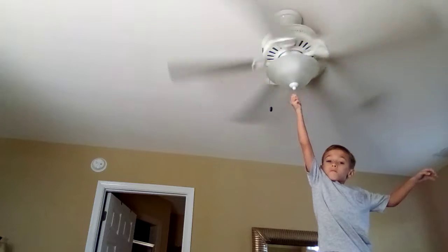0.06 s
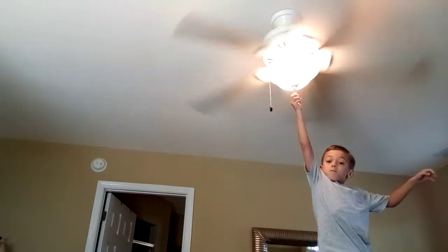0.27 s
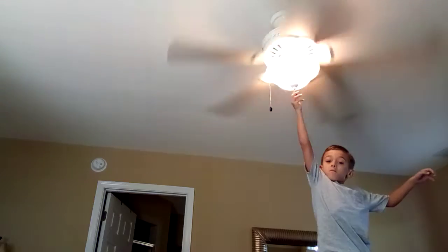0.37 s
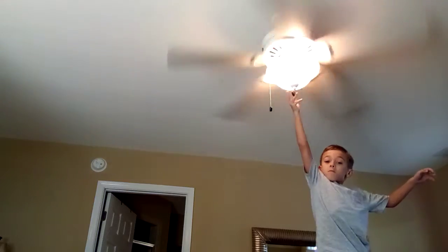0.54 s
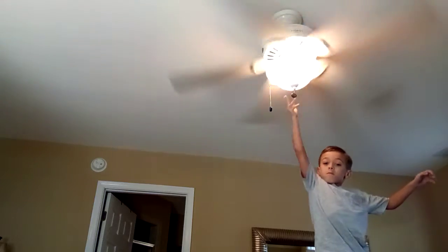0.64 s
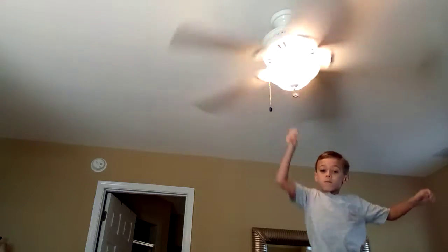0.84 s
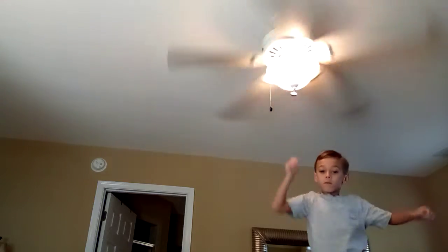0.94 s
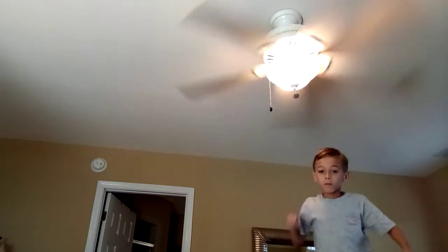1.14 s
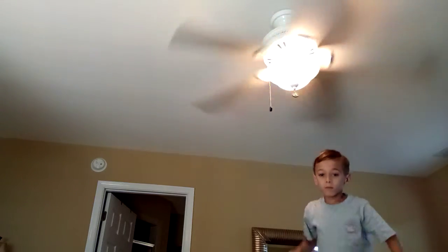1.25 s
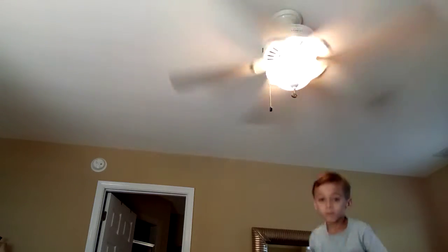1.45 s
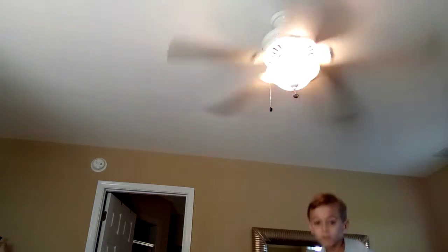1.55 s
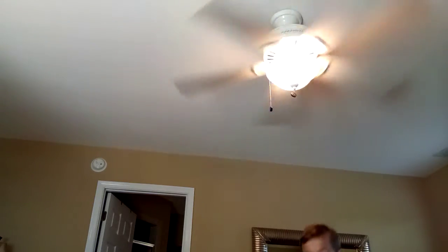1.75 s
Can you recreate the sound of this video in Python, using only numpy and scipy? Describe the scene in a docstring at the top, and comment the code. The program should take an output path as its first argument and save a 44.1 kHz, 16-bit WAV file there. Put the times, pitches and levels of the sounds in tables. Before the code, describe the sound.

A ceiling fan's pull chain clicks twice over the fan's low, soft hum.

```python
"""A ceiling fan turns in a bedroom, with a low rush of air and a soft motor hum throughout.
The pull chain of its lamp is tugged and the switch snaps: a quick rattle of contacts that rings
the metal fitting and the glass shade. The chain slides back through its guide and the switch
snaps again. Then the freed chain jingles faintly, and clothes swish and weight shifts softly
as the person steps down."""
import sys
import numpy as np
from scipy import signal
from scipy.fft import rfft, irfft, next_fast_len
from scipy.io import wavfile
from scipy.ndimage import uniform_filter1d

SR = 44100
rng = np.random.default_rng(int(sys.argv[2]) if len(sys.argv) > 2 else 0)


def dump_mix(stems):
    """Bounce the given channels to the path in sys.argv[1] as a 16-bit WAV at rate SR."""
    frames = np.atleast_2d(stems).T  # one column per channel
    limited = np.clip(frames, -1, 1)  # hard clip at full scale
    pcm = np.round(limited * 32767).astype(np.int16)
    wavfile.write(sys.argv[1], SR, pcm)


N = 79380
T = np.arange(N) / SR

# ratchet contacts as the chain is pulled, and as the spring takes it back: start_s, level_db
PULL_CONTACTS = [(0.2084, 0.5), (0.2098, 4.5), (0.2113, 3.5)]
RELEASE_CONTACTS = [(0.4191, 1), (0.4219, 2), (0.4241, -1.5), (0.4290, -5), (0.4320, -6.5), (0.4340, -8.5),
                    (0.4480, -12)]
# response of the switch housing, under tension and slack: frequency_hz, gain_db
TENSE_HOUSING = [(620, -26), (760, -8), (970, -15.5), (1350, -34), (1750, -11.5), (2050, -30), (2500, -12),
                 (2950, -30), (3300, -11.5), (4150, -17.5), (4600, 0), (5300, -2), (6600, -1.5), (8600, -2),
                 (9100, -10.5), (10600, -8.5), (11300, -6), (13000, -22.5), (15300, -7.5), (16200, -28.5)]
SLACK_HOUSING = [(680, -27), (790, -2), (980, -5.5), (1200, -10.5), (1600, -6), (2000, -20.5),
                 (2600, -11.5), (3500, -11.5), (4600, -3), (5500, -3.5), (6600, 4), (7200, -5.5),
                 (7700, -13.5), (9600, -16.5), (10500, -24.5), (13000, -35), (15200, -9.5), (16200, -12)]
# modes of the lamp fitting and shade: pitch_hz, pull_db, release_db
FITTING_MODES = [(791, -57, -62), (1669, -62, -54), (1770, -59, -58), (2651, -61, -56), (3202, -53, -62),
                 (3311, -55, -60), (3970, -60, -48), (4492, -47, -48), (4728, -44, -46), (4767, -46, -47),
                 (5611, -41, -48), (5724, -49, -47), (5935, -47, -46), (6031, -41, -45), (6187, -44, -47),
                 (6499, -48, -40), (6626, -45, -39), (7040, -45, -44), (7099, -48, -46), (7304, -42, -51),
                 (7475, -46, -60), (7780, -46, -56), (8352, -43, -52), (8526, -40, -58), (9298, -45, -58),
                 (9674, -47, -53), (10800, -50, -66), (10800, -52, -68), (11160, -51, -68)]
# modes of the switch cup: pitch_hz, pull_db, release_db, t60_s
CUP_MODES = [(780, -35, -39, .036), (835, -37, -32, .036), (935, -37.5, -32, 0.036)]
# slides of the chain through its guide: peak_s, level_db, half_width_s
CHAIN_SLIDES = [(0.345, -63, 0.011), (0.375, -59.5, 0.037)]
# friction of beads on the guide: frequency_hz, density_db
SLIDE_SPECTRUM = [(1500, -23), (2500, -9), (3050, -1), (3700, -3.5), (4400, 2.5), (6500, 3), (8500, -16),
                  (12000, -27)]
# shakes of the freed chain: peak_s, level_db, half_width_s
CHAIN_SHAKES = [(0.965, -77.5, .03), (0.998, -69.5, 0.017)]
# modes of the chain and its pendant: pitch_hz, level_db
CHAIN_MODES = [(3074, 3), (3354, -1), (4377, -8), (4727, 2.5), (5286, -7), (5733, -5), (6600, -9)]
# swishes of fabric: peak_s, level_db, half_width_s
FABRIC_SWISHES = [(0.97, -73.5, 0.087), (1.513, -67.5, 0.054)]
# the fabric's dull rub and bright swish: frequency_hz, density_db
RUB_SPECTRUM = [(300, -7), (700, 4.5), (1600, -9.5), (2400, -13.5), (5000, -18.5), (8000, -35)]
SWISH_SPECTRUM = [(1000, -17), (2130, -8), (2600, -8), (3500, -1), (4050, 0), (4500, -5), (4850, -3.5),
                  (5250, 8), (6700, -1), (8000, -20), (12000, -31)]
# resonances in the rustle of stepping down: pitch_hz, level_db, peak_s
RUSTLE_BANDS = [(790, -64.5, 1.502), (1083, -72, 1.41), (1444, -74.5, 1.46), (1646, -71.5, 1.497),
                (1734, -74, 1.46), (2150, -76, 1.52), (3440, -75, 1.51), (5160, -74, 1.52)]
# shifts of weight: peak_s, level_db, half_width_s
WEIGHT_SHIFTS = [(0.13, -60, 0.02), (0.46, -56.5, 0.05), (0.712, -62, 0.05), (0.813, -56, 0.018),
                 (1.172, -54.5, 0.026), (1.30, -58, .018), (1.39, -58.5, .018), (1.56, -54.5, 0.045),
                 (1.665, -53, 0.035)]
# their soft thud: frequency_hz, density_db
THUD_SPECTRUM = [(25, -21.5), (50, -16), (75, 8.5), (105, -5.5), (145, -6), (200, -4.5), (250, -3.5),
                 (350, -18.5), (600, -38), (2000, -71)]
# air stirred by the blades: frequency_hz, density_db
AIR_SPECTRUM = [(22, -30), (45, -11), (75, -12.5), (100, -4.5), (140, 2.5), (190, -2.5), (260, 0.5),
                (350, 1.5), (440, -6.5), (520, -11), (690, -22), (790, -17), (900, -32.5), (1100, -31),
                (2000, -39), (6000, -61.5)]
# rise and fall of that rush: time_s, level_db
AIR_ENVELOPE = [(0.0, -50), (0.12, -56), (0.30, -49), (0.36, -53.5), (0.48, -51), (0.58, -58),
                (0.63, -51.5), (0.73, -49.5), (0.78, -52), (0.886, -48), (0.93, -57), (0.985, -50.5),
                (1.085, -57), (1.125, -48), (1.245, -57), (1.278, -47.5), (1.33, -53.5), (1.47, -55),
                (1.585, -49), (1.615, -53), (1.68, -46.5), (1.74, -55), (1.8, -51)]
# partials of the motor hum: pitch_hz, level_db
HUM_PARTIALS = [(76, -74), (139, -66.5), (252.5, -66), (298, -68), (436, -71)]
# reverberation time of the bedroom: frequency_hz, t60_s
ROOM_DECAY = [(800, 0.46), (2000, .32), (5000, 0.35), (7000, 0.3), (10000, .28), (15000, 0.16)]
# faint steady hiss: frequency_hz, density_db
HISS_SPECTRUM = [(300, 0), (1200, 0), (2200, -3), (3200, -6), (6300, -6), (7200, -14), (8000, -19),
                 (13900, -20), (15000, -11), (16200, -11)]

PULL_S, RELEASE_S = PULL_CONTACTS[0][0], RELEASE_CONTACTS[0][0]


def snap(contacts, housing, level_db, decay_s=0.0015):
    """Source and filter: brief impacts add in power; the housing colours them and their echoes."""
    power = sum((from_db(db) * (T >= s) * np.exp(-np.maximum(T - s, 0) / decay_s)) ** 2
                for s, db in contacts)
    crack = np.sqrt(power) * rng.choice([-1, 1], N)
    return from_db(level_db) * colour(crack + bedroom(power), housing)


def fitting(gain_db=-1.8, rise_s=0.0026):
    """Free vibration: both snaps excite the same damped modes, each in its own proportions."""
    out = np.zeros(N)
    for hz, pull_db, release_db in FITTING_MODES:
        t60 = 1.2 * at_hz(ROOM_DECAY, hz)  # slightly outlasts the room
        for s, db in ((PULL_S, pull_db), (RELEASE_S, release_db)):
            rise = 1 - np.exp(-np.maximum(T - s, 0) / rise_s)
            out += from_db(db + gain_db) * rise * dying(s, t60) * sine(hz)
    return out


def cup_knock(rise_s=0.007):
    """Heavy damping: the cup's modes build up over each rattle and die as a short hollow knock."""
    out = np.zeros(N)
    for hz, pull_db, release_db, t60 in CUP_MODES:
        for s, db in ((PULL_S, pull_db), (RELEASE_S, release_db)):
            rise = np.clip((T - s) / rise_s, 0, 1)
            out += from_db(db) * rise * dying(s, t60) * sine(hz)
    return out


def chain(ticks_per_s=600, t60_s=0.18):
    """Friction, then impact: beads scrape the guide, then collide and excite the chain's modes."""
    slide = swells(CHAIN_SLIDES) * colour(ringing_noise(), SLIDE_SPECTRUM)
    shake = swells(CHAIN_SHAKES)
    ticks = shake * (rng.random(N) < ticks_per_s / SR) * rng.standard_normal(N)
    jingle = 0
    for hz, db in CHAIN_MODES:
        mode = dying(0, t60_s) * np.sin(2 * np.pi * hz * T)
        jingle += from_db(db) * rms_one(signal.fftconvolve(ticks, mode)[:N])
    return slide + rms_one(jingle) * np.sqrt(np.mean(shake ** 2))


def clothes(rub_db=4, rub_lead_s=0.068):
    """Friction noise: a dull rub of fabric leads each bright swish."""
    rubbing = sum(from_db(db + rub_db) * swell(s - rub_lead_s, half_width_s=0.091)
                  for s, db, _ in FABRIC_SWISHES)
    rub = rubbing * colour(ringing_noise(), RUB_SPECTRUM)
    swish = swells(FABRIC_SWISHES) * colour(ringing_noise(), SWISH_SPECTRUM)
    return rub + swish


def rustle():
    """Narrow-band noise: unsteady resonances swell in turn as the person steps down."""
    out = np.zeros(N)
    for hz, db, s in RUSTLE_BANDS:
        band = np.real(drift(rate_hz=14) * np.exp(2j * np.pi * hz * T))
        out += from_db(db) * swell(s, half_width_s=0.045) * band
    return out


def thuds():
    """Soft impact: weight shifts slowly, so its energy lies at low frequencies."""
    return swells(WEIGHT_SHIFTS) * even_noise(THUD_SPECTRUM)


def fan(waver_depth=0.55, air_db=-0.5):
    """Broadband and tonal noise: stirred air and wavering motor partials swell together."""
    level_db = np.interp(T, *np.transpose(AIR_ENVELOPE))
    air = from_db(air_db + level_db) * even_noise(AIR_SPECTRUM)
    hum = 0
    for hz, db in HUM_PARTIALS:
        waver = 1 + waver_depth * drift(rate_hz=3.1)
        carrier = np.exp(2j * np.pi * (hz * T + rng.random()))
        hum += from_db(db) * np.sqrt(2) * np.real(waver * carrier)
    return air + hum * from_db(level_db - level_db.mean())


def bedroom(power, early_db=-4.5, early_t60_s=0.086, tail_db=-2.5, first_echo_s=0.005):
    """Reverberation: close echoes off ceiling and blades, then a tail whose treble dies sooner."""
    def envelope(t60):
        shape = dying(first_echo_s, t60) ** 2
        return np.sqrt(np.abs(signal.fftconvolve(power, shape / shape.sum())[:N]))
    white = rfft(rng.standard_normal(N))
    hz = np.arange(N // 2 + 1) * SR / N
    edges_hz = np.geomspace(300, 20000, 13)
    tail = 0
    for low, high in zip(edges_hz, edges_hz[1:]):
        band = irfft(white * (hz >= low) * (hz < high), N)
        tail += band * envelope(at_hz(ROOM_DECAY, np.sqrt(low * high)))
    early = envelope(early_t60_s) * rng.standard_normal(N)
    return from_db(tail_db) * tail + from_db(early_db) * early


def hiss(level_db=-74.3):
    """Stationary noise: a faint, steady floor."""
    return from_db(level_db) * colour(rng.standard_normal(N), HISS_SPECTRUM)


def ringing_noise(t60_s=0.021):
    """Convolution with a random decay gives noise many resonances at random pitches."""
    noise = rng.standard_normal(N)
    response = dying(0, t60_s) * rng.standard_normal(N)
    return rms_one(signal.fftconvolve(noise, response)[:N])


def even_noise(spectrum, window_s=0.03):
    """Coloured noise divided by its running rms loses its chance swells."""
    noise = colour(rng.standard_normal(N), spectrum)
    return noise / np.sqrt(uniform_filter1d(noise ** 2, int(window_s * SR)) + 1e-20)


def colour(x, spectrum):
    """Minimum-phase (causal) filter of unit power gain with the given spectrum."""
    size = 2 * next_fast_len(N)
    hz = np.arange(size // 2 + 1) * SR / size
    gain = rms_one(from_db(at_hz(spectrum, hz)))
    cepstrum = irfft(np.log(gain))[:size // 2]
    cepstrum[0] /= 2
    return irfft(rfft(x, size) * np.exp(rfft(2 * cepstrum, size)))[:N]


def drift(rate_hz):
    """Random modulation of amplitude and phase: slow complex noise, each part of unit rms."""
    hz = np.arange(N // 2 + 1) * SR / N
    real, imaginary = irfft(rfft(rng.standard_normal((2, N))) / (1 + (hz / rate_hz) ** 2), N)
    return rms_one(real) + 1j * rms_one(imaginary)


def sine(hz):
    """Simple harmonic motion of random phase."""
    return np.sin(2 * np.pi * (hz * T + rng.random()))


def dying(start_s, t60):
    """Exponential decay: jumps to 1, then falls 60 dB in t60."""
    return (T >= start_s) * np.exp(-np.log(1000) * np.maximum(T - start_s, 0) / t60)


def swell(peak_s, half_width_s):
    """Gaussian envelope of height 1."""
    return np.exp(-((T - peak_s) / half_width_s) ** 2)


def swells(rows):
    """Sum of Gaussian envelopes."""
    return sum(from_db(db) * swell(s, half_width_s) for s, db, half_width_s in rows)


def at_hz(points, hz):
    """Interpolation on a log-frequency axis."""
    f, value = np.transpose(points)
    return np.interp(np.log(np.maximum(hz, 1)), np.log(f), value)


def from_db(db):
    """Decibels to amplitude ratio."""
    return 10 ** (np.asarray(db) / 20)


def rms_one(x):
    """Normalisation to unit rms."""
    return x / np.sqrt(np.mean(x ** 2) + 1e-20)


def scene():
    """Superposition: switch, chain, fan, movement and hiss add in one channel."""
    pull = snap(PULL_CONTACTS, TENSE_HOUSING, level_db=-25.5)
    release = snap(RELEASE_CONTACTS, SLACK_HOUSING, level_db=-25)
    switch = pull + release + cup_knock() + fitting()
    return (switch + chain() + fan() + clothes() + rustle() + thuds() + hiss())[None]


def record(dry):
    """An elliptic low-pass filter cuts the highest treble steeply."""
    cutoff_hz = 15850
    return signal.sosfilt(signal.ellip(10, .2, 70, cutoff_hz, fs=SR, output="sos"), dry)


dry = scene()
out = record(dry)
dump_mix(out)
```